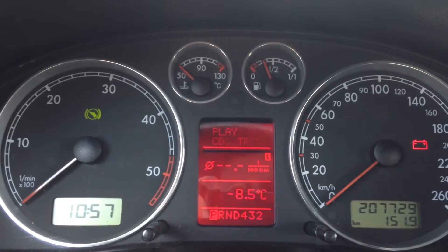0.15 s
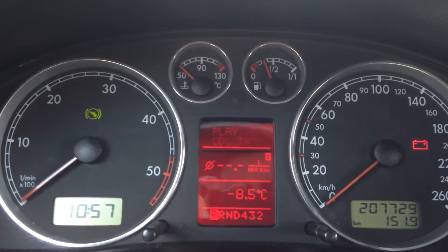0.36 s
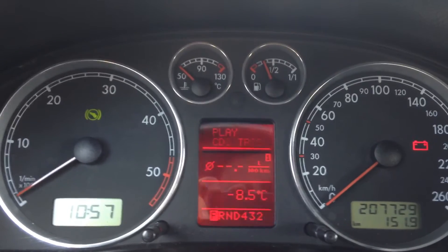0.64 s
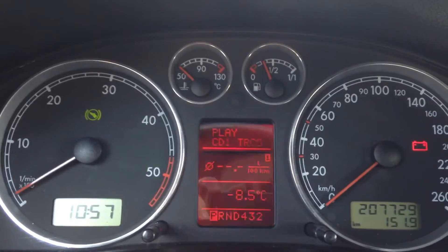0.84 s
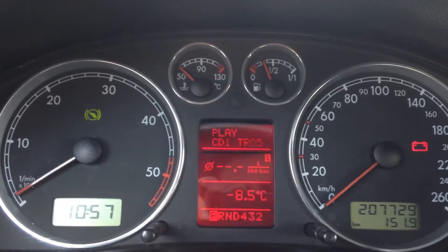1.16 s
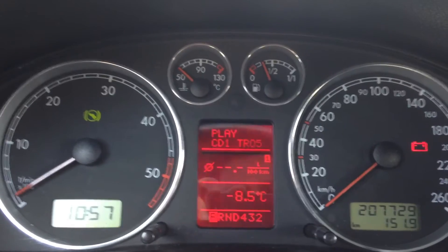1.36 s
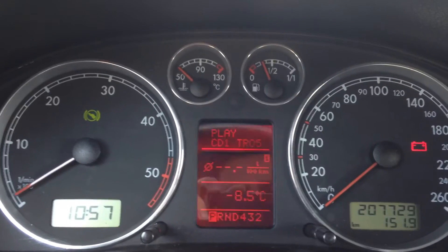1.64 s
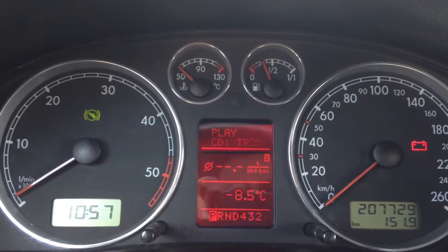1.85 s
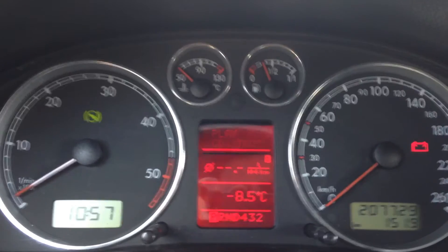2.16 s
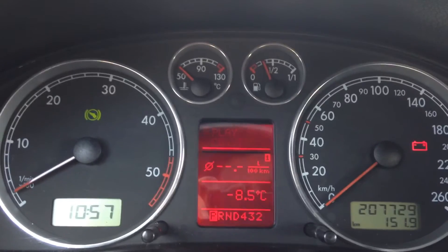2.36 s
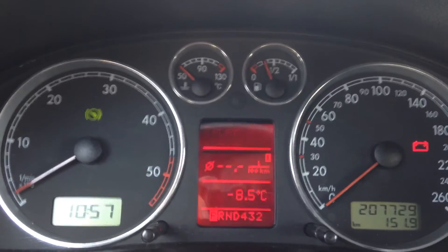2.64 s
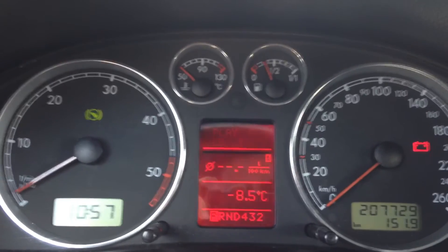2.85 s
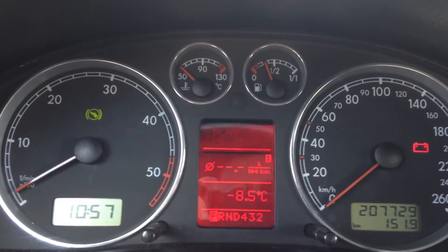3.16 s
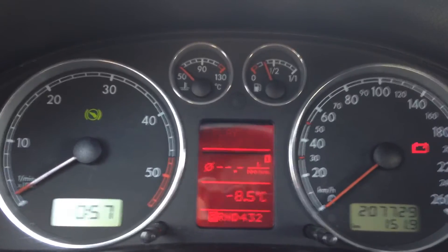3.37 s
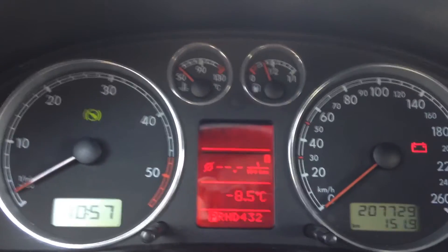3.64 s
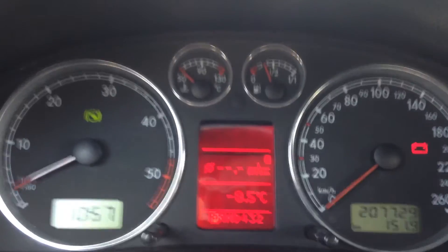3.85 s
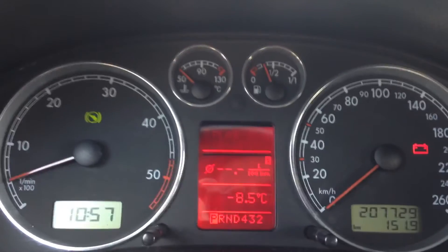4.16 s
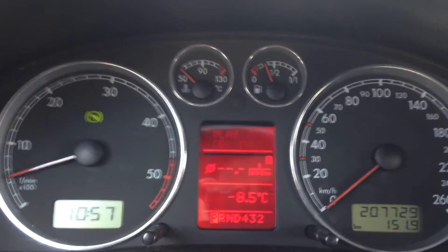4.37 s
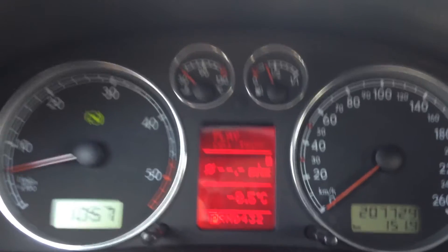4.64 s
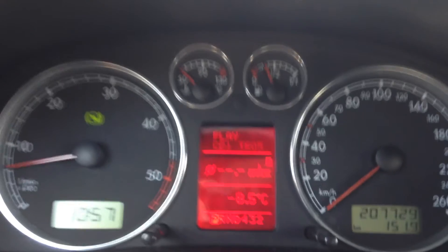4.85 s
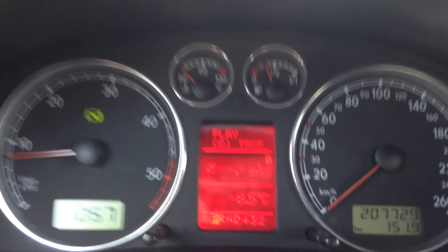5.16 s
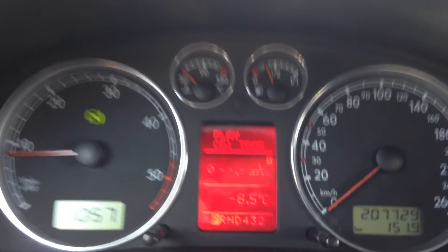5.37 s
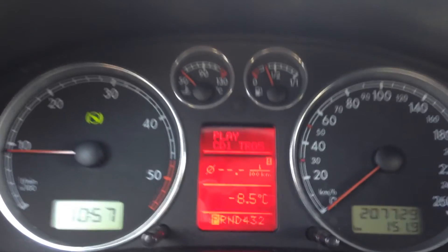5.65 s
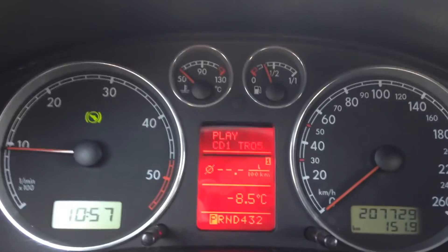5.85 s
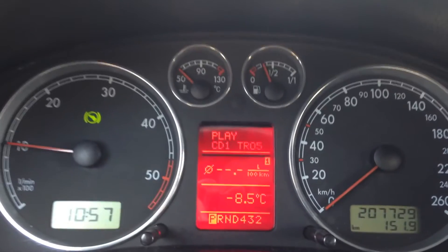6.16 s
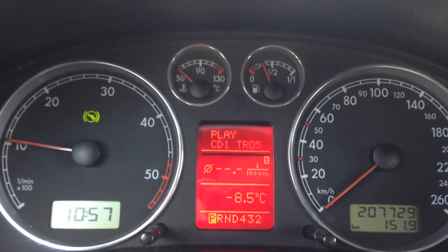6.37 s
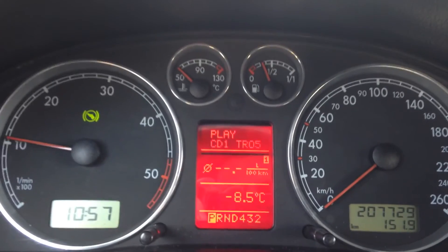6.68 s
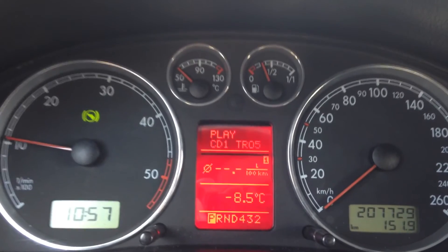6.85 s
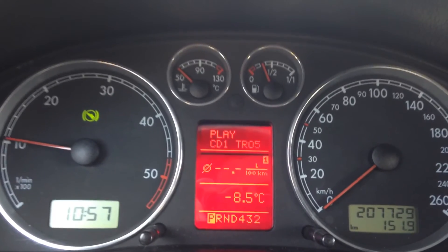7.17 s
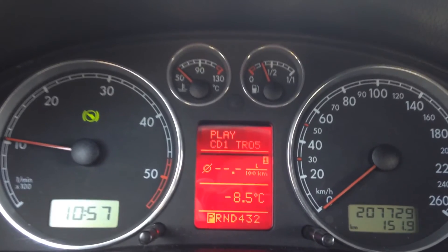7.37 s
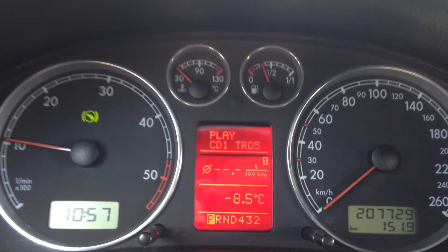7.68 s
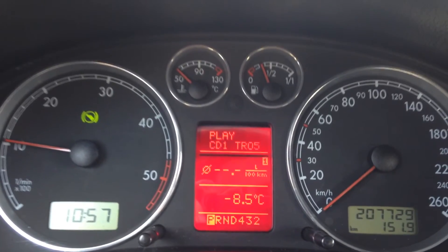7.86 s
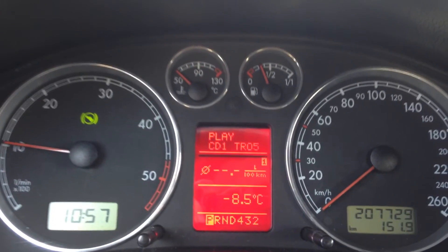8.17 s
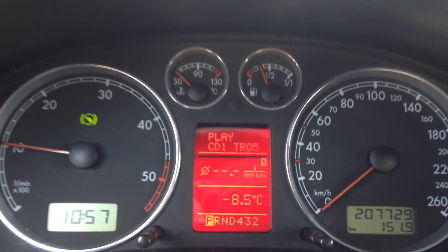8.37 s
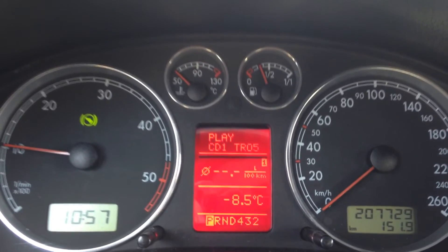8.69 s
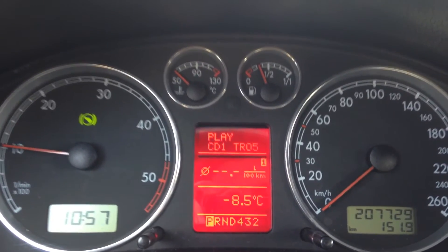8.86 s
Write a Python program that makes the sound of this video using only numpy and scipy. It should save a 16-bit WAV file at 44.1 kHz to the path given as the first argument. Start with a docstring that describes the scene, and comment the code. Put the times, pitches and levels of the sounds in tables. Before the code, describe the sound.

Inside a closed car, a starter motor labours over a cold diesel engine, its whine sagging and leaping while lone firings thump through the cabin. After nearly four seconds the engine catches and stumbles up to speed, shaking the body so the nearby dashboard plastic cracks and ticks. A small metal click follows, and the engine settles into a low, throbbing idle with a regular knock. The microphone is at the driver's seat.

```python
"""A four-cylinder diesel starts in hard frost; one microphone at the driver's seat, cabin closed.
First the starter labours over each compression beyond the bulkhead, and from 0.5 s lone firings thump the cabin.
Near 3.7 s the starter drops out and the engine stumbles up to speed, shaking the body so that the
dashboard plastic, an arm's length away, cracks and ticks. By 6 s it idles, a small metal click
sounds, and what stays is a low throb with a knock once a cycle."""
import sys
import numpy as np
from scipy import signal
from scipy.fft import rfft, irfft
from scipy.io import wavfile
from scipy.ndimage import uniform_filter1d

SR = 44100
rng = np.random.default_rng(int(sys.argv[2]) if len(sys.argv) > 2 else 0)


def wav_out(sig):
    """Save sig, one row per channel (or a flat mono array), as 16-bit PCM at SR to the path in sys.argv[1]."""
    wavfile.write(sys.argv[1], SR, np.round(np.clip(np.atleast_2d(sig).T, -1, 1) * 32767).astype(np.int16))


N = 397782
T = np.arange(N) / SR


def amp(db):
    """Decibels to gain."""
    return 10 ** (np.asarray(db) / 20)


def unit(x):
    """Scale to rms 1."""
    return x / np.sqrt(np.mean(x ** 2))


def peak(x):
    """Scale to a peak of 1."""
    return x / np.abs(x).max()


def curves(table):
    """Each column of a table, joined by straight lines in time."""
    times, *columns = np.transpose(table)
    return [np.interp(T, times, column) for column in columns]


def gain_at(hz, spectrum):
    """Gain at these frequencies of a spectrum of (frequency [Hz], level [dB])."""
    points_hz, db = np.transpose(spectrum)
    return amp(np.interp(np.log(hz + 1), np.log(points_hz), db))


def noise(spectrum):
    """Noise of rms 1 with this colour, falling away above its last point."""
    hz = np.arange(N // 2 + 1) * SR / N
    fall = 1 / (1 + (hz / spectrum[-1][0] / 2) ** 2)
    return unit(irfft(rfft(rng.standard_normal(N)) * gain_at(hz, spectrum) * fall, N))


def band(x, lo_hz, hi_hz, order=2):
    """Band-pass."""
    return signal.sosfilt(signal.butter(order, [lo_hz, hi_hz], "band", fs=SR, output="sos"), x)


def ring(x, modes):
    """Drive a set of resonances; neighbours swing in opposite senses."""
    return sum((-1) ** k * amp(db) * signal.lfilter(*signal.iirpeak(hz, hz / width, fs=SR), x)
               for k, (hz, width, db) in enumerate(modes))


def add(out, s, x):
    """Mix a sound in at s seconds."""
    i = int(np.clip(s * SR, 0, N - 1))
    out[i:i + len(x)] += x[:N - i]


def swell(t, rise_s):
    """A push that peaks at 1 after rise_s and dies away."""
    u = np.maximum(t, 0) / rise_s
    return u * np.exp(1 - u)


def gate(phase, at, width):
    """A smooth burst once per turn of the phase, rms 1."""
    offset = (phase - at + .5) % 1 - .5
    return unit(np.exp(-.5 * (offset / width) ** 2))


# the microphone's noise floor: (frequency [Hz], level [dB])
HISS = [(30, 10.5), (300, 11.5), (900, -30), (2000, -0.5), (4000, 4.5), (8000, 2), (15000, 2.5)]


def microphone_hiss():
    """The microphone's own steady noise, under everything."""
    return amp(-66) * noise(HISS)


# the car's shaking, felt at the seat: (time [s], level [dB])
SHAKE = [(0, -52.5), (3.3, -51), (3.85, -36), (4.35, -39.5), (4.65, -32), (5.8, -32), (6.45, -33.5),
         (9.02, -32)]


def shaking():
    """How hard the body shakes: a sustained part, and a lurch after each lone firing."""
    lurch_power = sum((amp(db - 21.5) * swell(T - s, rise_s=.058)) ** 2 for s, db, _ in FIRINGS)
    return np.sqrt(amp(curves(SHAKE)[0]) ** 2 + lurch_power)


# panels all round the microphone, and the engine bay ahead: (frequency [Hz], level [dB])
PANEL_RUMBLE = [(20, -19), (35, -1.5), (50, 3.5), (70, 6), (110, 2.5), (175, 2), (250, -12.5), (400, -14),
                (520, -26), (800, -33)]
BAY_RUSTLE = [(200, 8), (420, 12), (620, 0.5), (900, 1), (1150, -21), (1700, -26), (2600, -53),
              (4500, -36.5), (8000, -24)]


def body_and_bay(phase, shake):
    """Panels rumble and the engine bay rustles, both pulsing with the crankshaft."""
    rumble = noise(PANEL_RUMBLE)
    lows = signal.sosfiltfilt(signal.butter(3, 125, fs=SR, output="sos"), rumble)
    # the deep lurching on the mounts dies away once every cylinder fires
    panels = rumble - np.interp(T, [5.8, 6.8], [0, .75]) * lows
    idle_hz, db_per_octave = 35.8, 6.5
    bay_db = -53.5 + db_per_octave * np.log2(curves(FIRING_RATE)[0] / idle_hz)
    # the bay swells with the first cylinder while the running engine is still rough
    depth_db = np.interp(T, [5, 5.4, 6.5, 8], [0, 4, 3.5, 1.5])
    swing_db = depth_db * np.cos(2 * np.pi * (phase - .15) / len(CYLINDERS))
    pulsing = 1 + .15 * np.cos(2 * np.pi * (phase - .45))
    return pulsing * (shake * panels + amp(bay_db + swing_db) * noise(BAY_RUSTLE))


# a small metal part, perhaps a relay: (frequency [Hz], width [Hz], level [dB])
CLICK_MODES = [(3600, 150, -1), (3930, 180, -4), (4490, 140, -2), (6600, 160, -9), (7600, 130, -4),
               (11000, 4000, -20)]


def metal_click():
    """One small click rings briefly once the engine is running."""
    at_s, decay_s = 6.055, .0087
    t = np.arange(SR // 8) / SR
    strike = np.exp(-t / decay_s) * rng.standard_normal(len(t))
    out = np.zeros(N)
    add(out, at_s, amp(-36.5) * peak(ring(strike, CLICK_MODES)))
    return out


# loose trim around the seat: (frequency [Hz], level [dB])
TRIM = [(600, -23), (1400, -9), (2200, 0), (3200, -1.5), (4500, -4), (7000, -4.5), (10000, -10)]


def trim_crackle(shake):
    """As the engine catches, loose trim ticks, more densely the harder the body shakes."""
    per_s = 2400 * shake * np.interp(T, [3.6, 3.8, 4.9, 5.4], [0, 1, 1, 0])
    hits = rng.random(N) < per_s / SR
    hit_db = np.minimum(4 * rng.exponential(size=N), 10)
    decay = np.exp(-np.arange(SR // 40) / SR / .01)
    # every tick is a fresh scrape, so no two ring alike
    envelope = signal.fftconvolve(hits * amp(hit_db), decay)[:N]
    return amp(-45.5) * peak(envelope * noise(TRIM))


def firing_ticks():
    """Rows like CRACKS: a tick just after each lone firing, a thinner one before it after a pause."""
    pause_s, treble_db, decay_s = .4, -3, .0055
    times = np.array(FIRINGS)[:, 0]
    after_pause = times[np.diff(times, prepend=0) > pause_s]
    late = [(s + .005, -55.5, 2.5, treble_db, decay_s) for s in times]
    early = [(s - .072, -55, -5, treble_db, decay_s) for s in after_pause]
    return late + early


# the dashboard panel, an arm's length away: (frequency [Hz], width [Hz], level [dB])
PLASTIC_MODES = [(360, 76, -0.5), (496, 67, 0.5), (650, 39, -3), (760, 190, -5), (1460, 250, 0),
                 (1673, 58, 3), (1900, 130, 4.5), (2234, 220, 1), (2590, 100, 7.5), (2854, 31, 8.5),
                 (3100, 390, 5.5), (4150, 120, 6.5), (4320, 110, 8.5), (4800, 340, 4), (5540, 290, 3),
                 (6980, 620, -6.5), (7970, 150, -6), (9240, 830, -12), (12100, 6800, -21.5)]
# its cracks: (time [s], mid-band peak [dB], body re mid [dB], treble re mid [dB], decay [s])
CRACKS = [(0.4886, -47.5, 0, -7, 0.002), (3.7064, -37, -3, -10.5, .0032), (3.7135, -35.5, -4, -15, 0.0045),
          (3.7864, -25, -10, -7.5, 0.0019), (3.7978, -26, 5.5, -4, 0.0037), (3.8065, -36, 5, -16, 0.011),
          (3.8533, -38.5, 4, 0.5, .0037), (3.87, -49, 8, 3, 0.0056), (4.0994, -49, 4, -8, 0.0094),
          (4.285, -44, -11, -8, 0.0027), (4.2924, -45, 0.5, -5.5, .006), (4.482, -43.5, -1.5, -9, .0019),
          (4.557, -44, 2, 4, 0.02), (4.595, -29, 2, -2.5, 0.0052), (4.7979, -32.5, 7, -2, 0.0016),
          (4.8066, -37, 5, -4, 0.0052), (5.1061, -19.5, 3, 7.5, 0.0025), (5.322, -47, -14.5, 2.5, .0026)]


def dashboard():
    """Cold plastic creeps, slips in a burst of tiny snaps that ring the panel, and chatters briefly."""
    lead_s, hold_samples = .012, 60
    t = np.arange(SR // 8) / SR - lead_s
    out = np.zeros(N)
    for s, db, body_db, treble_db, decay_s in CRACKS + firing_ticks():
        slip = np.exp(np.minimum(t / .0017, -t / decay_s))
        flicker_db = 4 * np.repeat(rng.standard_normal(len(t) // hold_samples + 1), hold_samples)
        chatter = amp(flicker_db[:len(t)] - 19.5) * np.exp(np.minimum(t / .004, -t / .01))
        panel = ring((slip + chatter) * rng.standard_normal(len(t)), PLASTIC_MODES)
        top_db = 1.27 * treble_db - 7.5  # a dull crack loses its very top faster than its treble
        parts = [(296, 1530, body_db), (2230, 3440, 0), (3520, 5860, treble_db), (7550, 13400, top_db)]
        for lo_hz, hi_hz, part_db in parts:
            add(out, s - lead_s + .0008, amp(db + part_db) * peak(band(panel, lo_hz, hi_hz, order=3)))
    return out


# compressions while cranking: (time of top dead centre [s], gear mesh [Hz])
STROKES = [(-.08, 187), (.165, 186.4), (0.404, 184.5), (0.519, 280), (.72, 230), (0.944, 194),
           (1.19, 168.9), (1.29, 280.2), (1.497, 234), (1.74, 182), (1.979, 170.2), (2.071, 280),
           (2.18, 333), (2.418, 233), (2.65, 178.2), (2.75, 281), (2.88, 330.5), (3.149, 205), (3.382, 178),
           (3.47, 280), (3.581, 319), (3.8, 335)]
# the starter runs free after each, faster if a firing helped: (mesh at dead centre [Hz], free mesh [Hz])
FREE_RUN = [(235, 321), (280, 378)]
# the whine's path to the seat, the teeth's rasp and the low churn: (frequency [Hz], level [dB])
GEAR_PATH = [(100, -8), (160, 8), (186, 11.5), (215, 1.5), (260, -5), (335, -2.5), (420, -24), (550, -11),
             (700, -18.5), (1000, -13), (1400, -19)]
RASP = [(250, -3), (450, 13), (560, -14), (680, 2), (780, -2.5), (890, 8.5), (950, -3.5), (1010, 6.5),
        (1150, -13), (1450, -10), (2200, -26), (5000, -51)]
CHURN = [(60, -14), (120, -26), (176, 7.5), (230, -4), (290, -9), (335, 2), (375, -10.5), (430, -6),
         (560, -18), (900, -26.5)]


def starter():
    """The pinion's whine sags on every compression and leaps after it; the teeth rasp under load."""
    times, loaded_hz = np.transpose(STROKES)
    free_hz = np.interp(loaded_hz, *np.transpose(FREE_RUN))
    number = np.arange(len(times))
    stroke = np.interp(T, times, number)
    knots = np.ravel([number, number + .3, number + .62], order="F")
    knot_hz = np.ravel([loaded_hz, free_hz, .93 * free_hz], order="F")
    flutter = 1 + .0141 * noise([(10, -3.5), (60, -10.5), (120, -25)])
    mesh_hz = uniform_filter1d(np.interp(stroke, knots, knot_hz), size=650) * flutter
    angle = 2 * np.pi * np.cumsum(mesh_hz) / SR
    whine = sum(amp(db) * gain_at(k * mesh_hz, GEAR_PATH) * np.sin(k * angle)
                for k, db in enumerate([-3.5, -7, -15, -14, -15.5], 1))
    # the teeth bear hardest on the way up to top dead centre, and rasp less at speed
    load_db = 5 * np.cos(2 * np.pi * (stroke - .85))
    ease_db = -7 * np.log2(np.interp(T, times, loaded_hz) / loaded_hz[0])
    churn = amp(-50) * noise(CHURN)
    rasp = amp(ease_db - 61) * gate(stroke, at=.79, width=.16) * noise(RASP)
    engaged = np.interp(T, [3.6, 3.85], [1, 0])
    return engaged * (amp(load_db - 46) * whine + churn + rasp)


# the cabin round the microphone, the block and bulkhead ahead of it, and one cylinder's heavy knock:
# (frequency [Hz], width [Hz], level [dB])
CABIN_MODES = [(37.3, 14, 2), (67.7, 28.7, 1), (102, 9.1, 4.5), (142.2, 31, 0.5), (167.9, 24.8, 0.5),
               (202, 53, -12), (291, 130, -17.5)]
BLOCK_MODES = [(605, 160, 2.5), (753, 79, 5.5), (943, 67, -2.5), (1123, 18, 2), (1400, 72, -3.5),
               (1820, 160, -11), (2320, 95, -13)]
KNOCK_MODES = [(337, 19, -16.5), (379.6, 20, 1), (462, 33.3, 2.5), (486.2, 43, 0)]
# lone firings until the engine runs: (time [s], thump level [dB], clatter level [dB])
FIRINGS = [(.506, -22, -57.5), (1.279, -22, -57), (2.062, -21, -58), (2.173, -22.5, -54), (2.744, -21, -57),
           (2.861, -26.5, -54), (3.457, -23.5, -60), (3.571, -25, -56.5), (3.695, -24.5, -51),
           (3.787, -16.5, -51), (3.877, -20.5, -49.5), (3.999, -25, -53), (4.126, -21.5, -60),
           (4.197, -23.5, -53), (4.271, -23, -54), (4.387, -25.5, -51), (4.469, -18, -53.5),
           (4.538, -15, -50.5), (4.598, -13.5, -40.5), (4.799, -18, -40.5), (4.848, -20, -59),
           (4.935, -16, -51), (4.993, -15.5, -48.5), (5.204, -15.5, -47.5), (5.24, -21.5, -49),
           (5.4, -21.5, -48.5), (5.464, -19, -54.5), (5.62, -19, -62), (5.744, -15, -53), (5.781, -15, -50)]


def lone_firings():
    """Each firing kicks the block against its mounts: it clatters, and the cabin booms, lows last."""
    t = np.arange(SR // 3) / SR
    boom_hz = 92 + 150 * np.exp(-t / .019)
    boom = np.sin(2 * np.pi * np.cumsum(boom_hz) / SR) * swell(t, .011) * np.exp(-(t / .06) ** 2)
    out = np.zeros(N)
    for s, thump_db, clatter_db in FIRINGS:
        kick = rng.standard_normal(len(t)) * swell(t, .012)
        shudder = band(ring(kick, CABIN_MODES), 45, 400)
        add(out, s - .001, amp(thump_db) * (.41 * boom + .56 * peak(shudder)))
        rattle = rng.standard_normal(len(t)) * (swell(t, .0046) + .42 * swell(t, .02))
        clatter = 2.02 * peak(ring(rattle, BLOCK_MODES)) + 3.17 * peak(ring(rattle, KNOCK_MODES))
        add(out, s, amp(clatter_db) * clatter)
    return out


# engine speed: (time [s], firing rate [Hz])
FIRING_RATE = [(3.4, 8.5), (4.4, 11), (4.7, 15), (5, 22), (5.25, 31), (5.45, 32.5), (5.7, 30), (5.82, 35.4),
               (6.2, 36.2), (6.4, 38.2), (6.6, 36.6), (6.85, 36.4), (7.15, 35.65), (7.45, 36.15),
               (8.05, 35.2), (8.35, 35.35), (9.02, 34.2)]


def firing_phase():
    """The crankshaft's progress, counted in firings from the start of one idle cycle."""
    cycle_start_s = 7.3017
    phase = np.cumsum(curves(FIRING_RATE)[0]) / SR
    return phase - np.interp(cycle_start_s, T, phase)


# the engine from the seat: (time [s], throb [dB], rocking [dB], mechanism [dB], unevenness [0 = even])
RUNNING = [(3.5, -82, -83, -85, 1.1), (3.9, -41, -50, -89, 1), (5.1, -49, -58, -61.5, .8),
           (5.5, -34.5, -52, -52, 0.3), (6, -36, -36.5, -51.5, 1.4), (8.65, -34.5, -38, -53.5, 0.93),
           (8.8, -31, -40, -55, 0), (9.02, -32, -38.5, -59, .2)]
# cylinders in firing order: (strength [dB], rise of the push [s], clatter [dB])
CYLINDERS = [(3, .0003, 1), (0, .0006, -8), (-2.5, .0008, 1), (1.5, .0005, -8)]
# the first cylinder's metallic ping: (frequency [Hz], width [Hz], level [dB])
PING_MODES = [(1098, 34, 4.5), (1287, 120, -1), (1466, 270, -12.5), (1870, 110, -16)]
# the injectors' tick: (frequency [Hz], level [dB])
INJECTORS = [(1200, -8), (2000, -9), (2750, -20), (3150, 10), (3600, -3), (4400, 5), (6000, -4),
             (10000, -6)]


def running_engine(phase):
    """Firings ring the cabin and rattle the block; injectors tick, one cylinder pings and one knocks."""
    throb_db, rock_db, mechanism_db, uneven = curves(RUNNING)
    t = np.arange(SR // 8) / SR
    pulses, metal = np.zeros((2, N))
    for firing in range(int(phase[0]) + 1, int(phase[-1]) + 1):
        cylinder = firing % len(CYLINDERS)
        strength_db, push_s, clatter_db = CYLINDERS[cylinder]
        late, harder, louder = rng.standard_normal(3)
        s, stroke_s = np.interp([firing, firing + .26], phase, T) + .00015 * late
        # cold cylinders fire unequally until the idle evens out
        force = amp(strength_db * np.interp(s, T, uneven) + .8 * harder)
        add(pulses, stroke_s, -force * swell(t, push_s) / push_s)
        rattle = rng.standard_normal(len(t)) * swell(t, .0041)
        add(metal, s - .002, amp(2 + clatter_db + louder) * peak(ring(rattle, BLOCK_MODES)))
        if cylinder == 0:
            add(metal, s - .002, amp(1 + louder) * peak(ring(rattle, PING_MODES)))
        if cylinder == 2:
            blow = swell(t, .0004) + .08 * rattle
            add(metal, s - .003, amp(17 + .6 * louder) * peak(ring(blow, KNOCK_MODES)))
    throb = band(ring(pulses, CABIN_MODES), 97.5, 334, order=3)
    throb /= np.std(throb[T > 6])  # rms 1 at idle
    # the block rocks on its mounts at the firing rate; even firing adds a firm second order
    evenness = 1 - np.clip(uneven, 0, 1)
    rocking = np.sqrt(2) * (np.cos(2 * np.pi * phase) - evenness * np.cos(4 * np.pi * (phase - .37)))
    injectors = amp(-23.5) * gate(phase, at=.34, width=.053) * noise(INJECTORS)
    metal_band = band(metal, 200, 2200, order=4)
    mechanism = metal_band + injectors
    return amp(throb_db) * throb + amp(rock_db) * rocking + amp(mechanism_db) * mechanism


def scene():
    """Engine ahead, dashboard close by and the body all round, in mono at the driver's seat."""
    phase, shake = firing_phase(), shaking()
    engine = starter() + lone_firings() + running_engine(phase)
    cabin = body_and_bay(phase, shake) + dashboard() + trim_crackle(shake) + metal_click()
    return (engine + cabin)[None]


def record(dry):
    """The microphone adds its hiss and the recorder cuts the top."""
    top_hz = 15400
    lowpass = signal.ellip(10, .2, 80, top_hz, fs=SR, output="sos")
    return signal.sosfilt(lowpass, dry + microphone_hiss())


dry = scene()
out = record(dry)
wav_out(out)
```